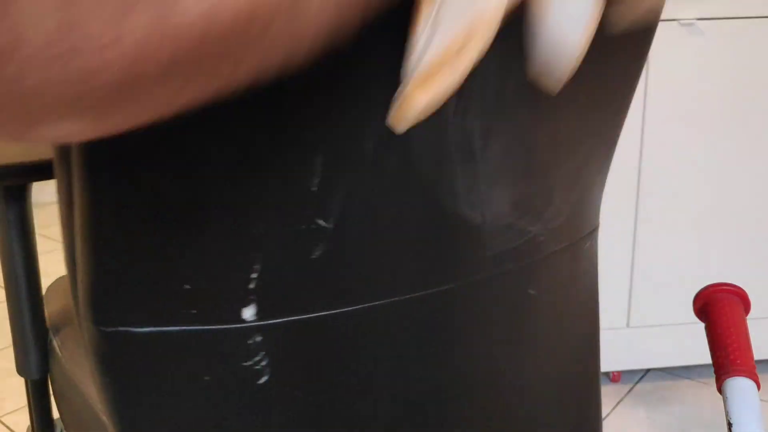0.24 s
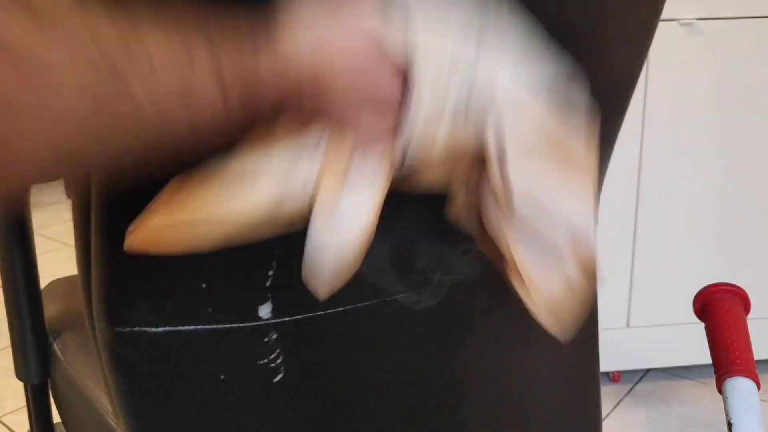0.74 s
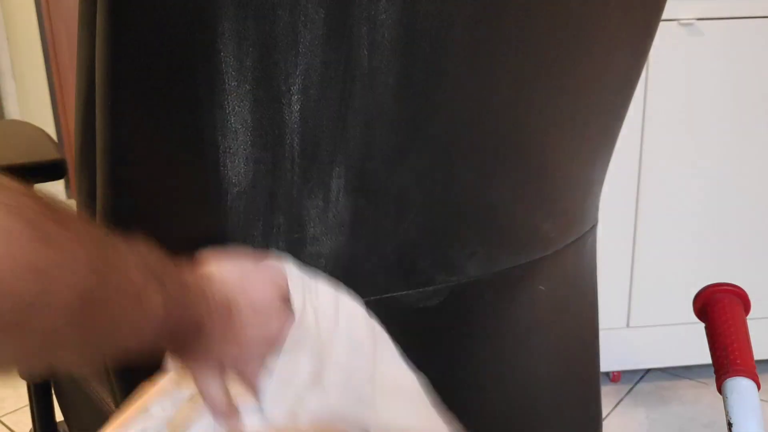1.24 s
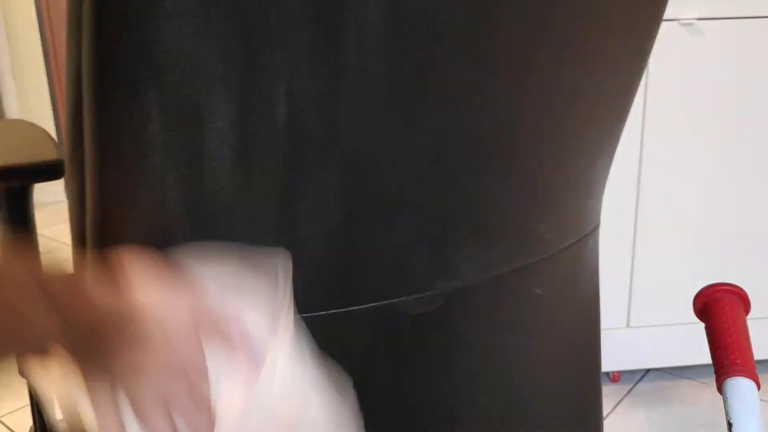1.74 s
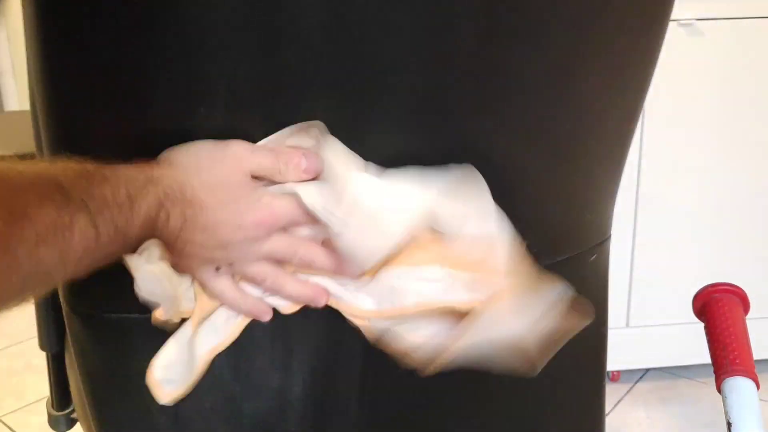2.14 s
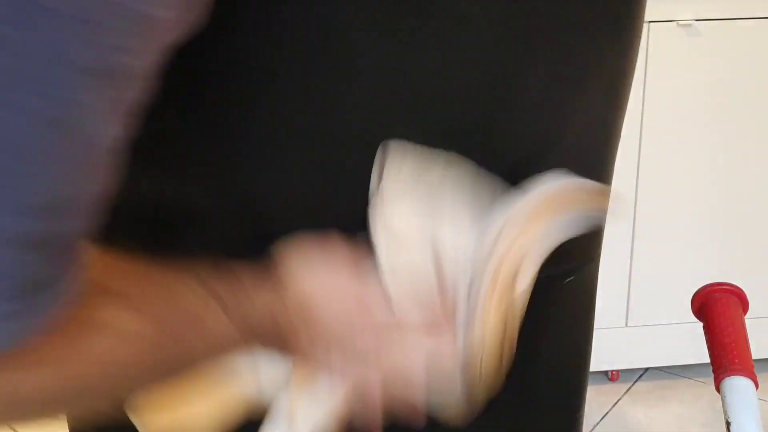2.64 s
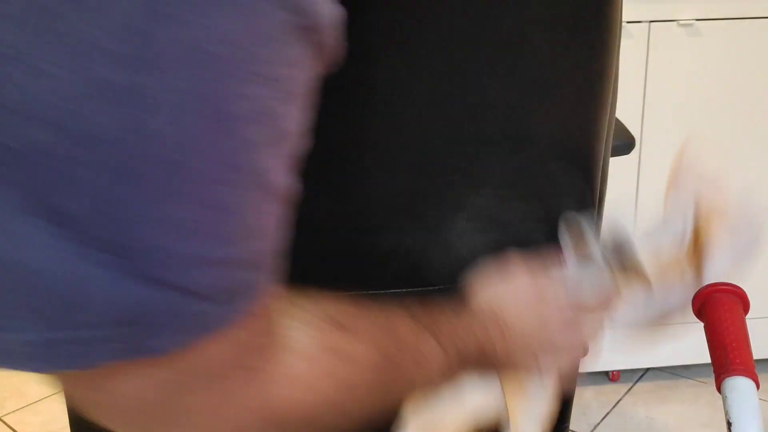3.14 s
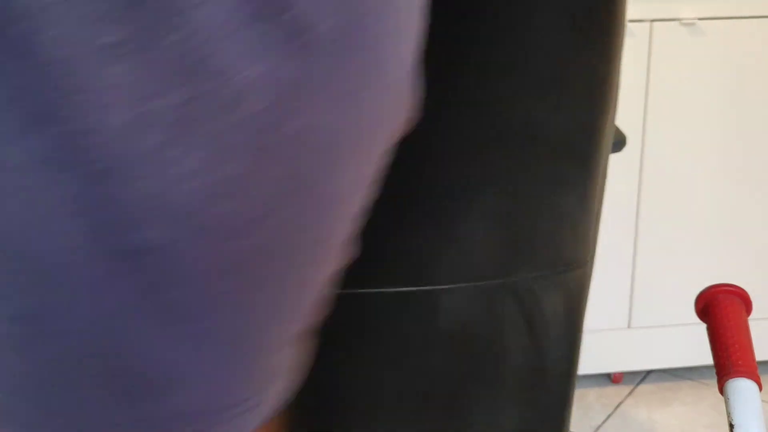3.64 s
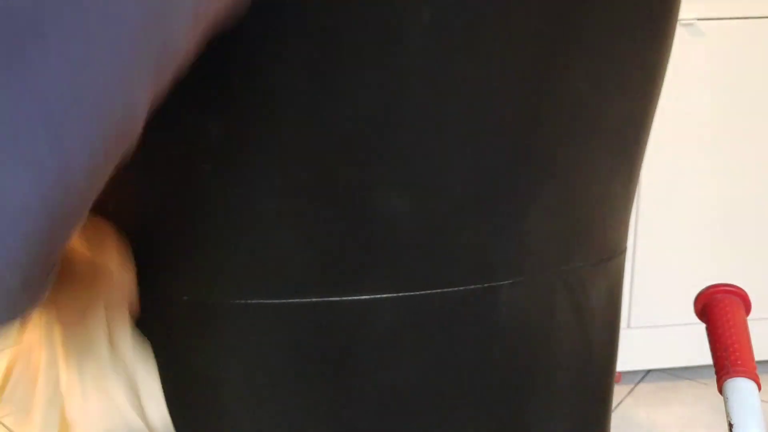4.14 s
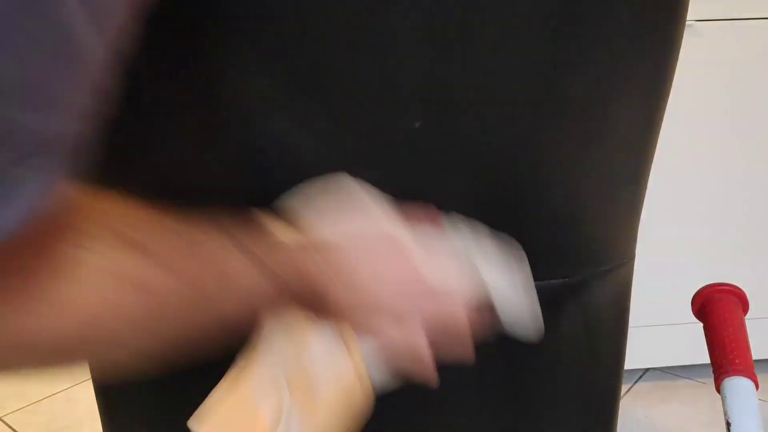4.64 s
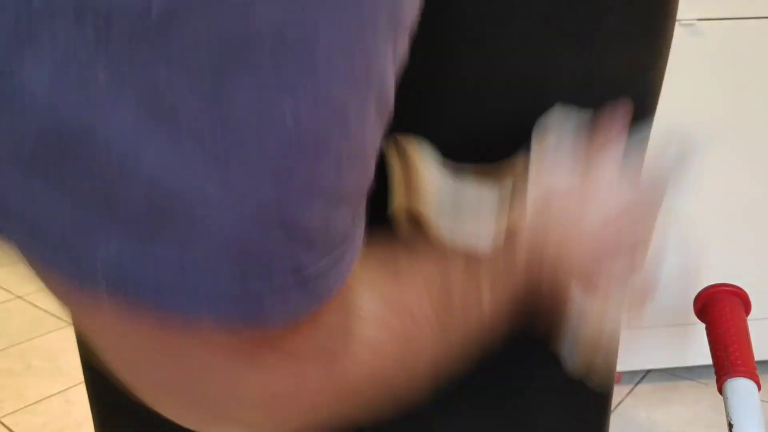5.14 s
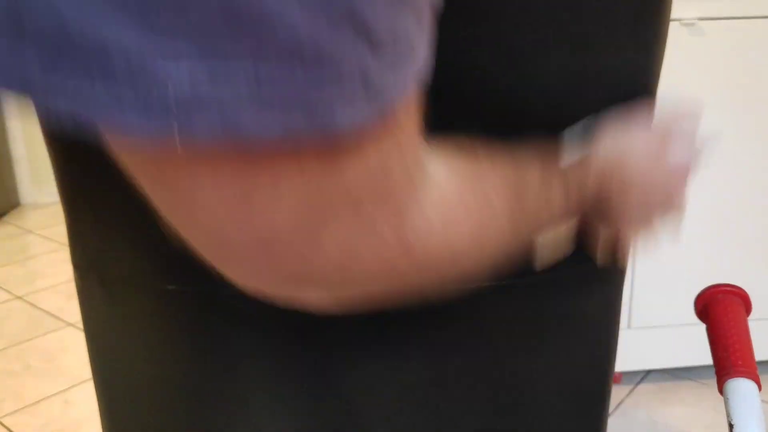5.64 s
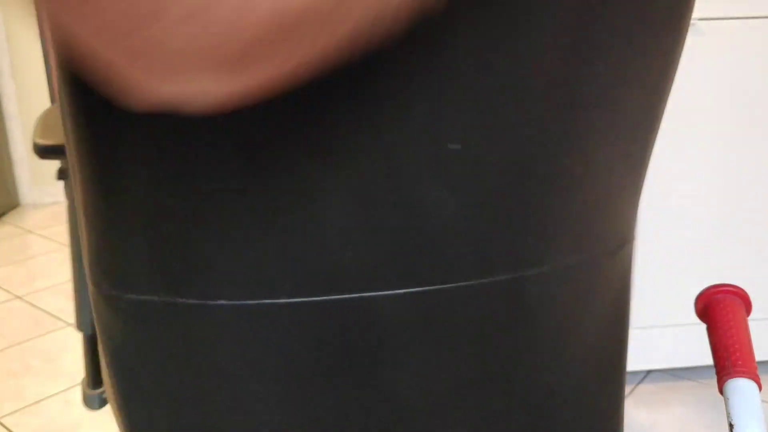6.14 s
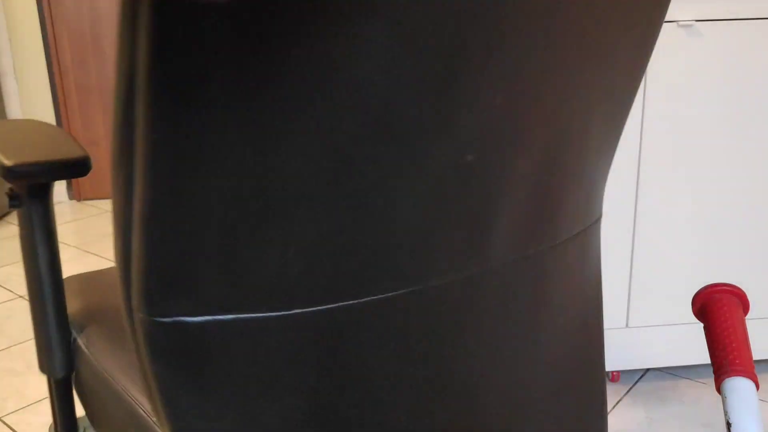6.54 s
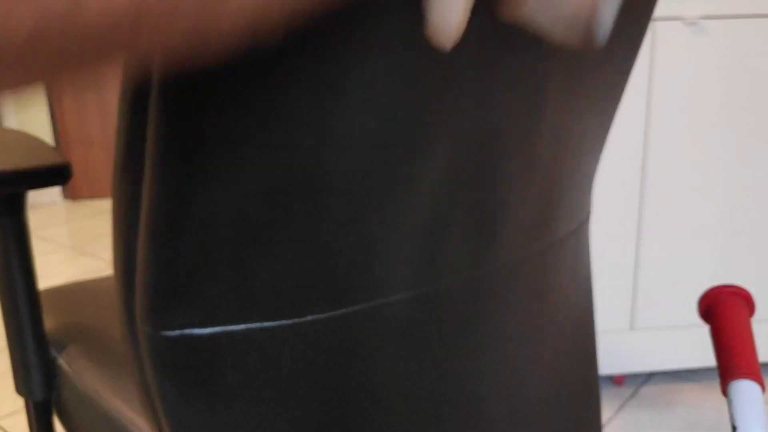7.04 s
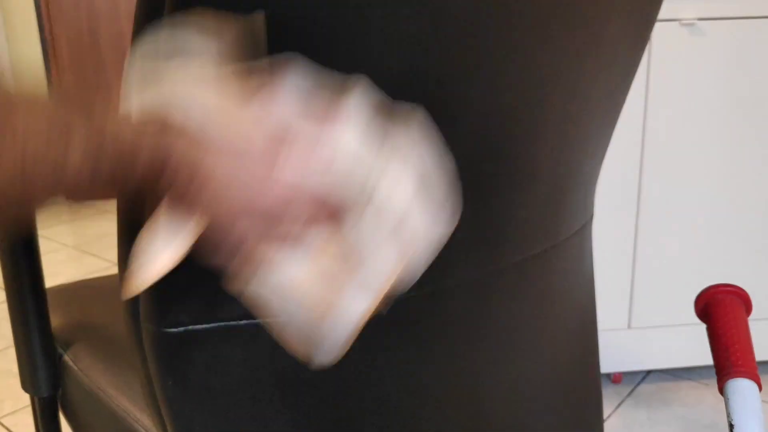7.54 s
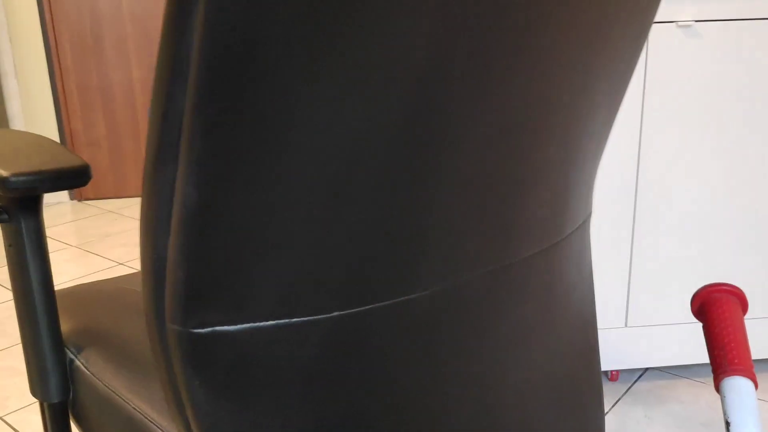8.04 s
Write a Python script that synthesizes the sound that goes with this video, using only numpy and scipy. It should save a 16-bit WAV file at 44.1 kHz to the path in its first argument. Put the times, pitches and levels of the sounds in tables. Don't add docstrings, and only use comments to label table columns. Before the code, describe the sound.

A dry rag wipes a padded leather chair back in fast, uneven hissing strokes, close to a stereo microphone in a quiet tiled room. Knuckles bump the seam early on and the padding thuds softly. The strokes are strongest in the first three seconds, where a cloth edge cracks sharply; they then grow softer and more spaced, before quick swipes resume and fade.

```python
import sys
import numpy as np
from scipy import signal
from scipy.fft import rfft, irfft
from scipy.io import wavfile
from scipy.ndimage import uniform_filter1d

SR = 44100
rng = np.random.default_rng(int(sys.argv[2]) if len(sys.argv) > 2 else 0)


def dump_mix(stems):
    frames = np.atleast_2d(stems).T
    limited = np.clip(frames, -1, 1)
    pcm = np.round(limited * 32767).astype(np.int16)
    wavfile.write(sys.argv[1], SR, pcm)


def voltage_ratio(level):
    return 10 ** (np.asarray(level, float) / 20)


N = 364751
SIZE, HOP = 512, 128
HZ = np.fft.rfftfreq(SIZE, 1 / SR)


def evened(x):
    return x / np.sqrt(np.mean(abs(x) ** 2) + 1e-20)


def read(points, hz):
    f, value = np.transpose(points)
    return np.interp(np.log(hz + 1), np.log(f + 1), value)


def along(rows, t):
    s, *columns = np.transpose(rows)
    return [np.interp(t, s, c) for c in columns]


def add(mix, s, sound):
    part = mix[max(round(s * SR), 0):][:len(sound)]
    part += sound[:len(part)]


def coloured(x, gain):
    return irfft(rfft(x) * gain(np.fft.rfftfreq(x.shape[-1], 1 / SR)), x.shape[-1])


def power_sum_db(*levels_db):
    return 10 * np.log10(sum(voltage_ratio(2 * level) for level in levels_db))


# f/Hz, likeness/0..1
SAME = [(60, 0.6), (200, 1), (400, 0.91), (700, 0.82), (1300, 0.63), (2400, 0.42), (4400, 0.55),
        (8000, .02)]


def likeness(hz):
    return read(SAME, hz)


def pair(shared, left, right, same):
    same = np.clip(same, 0, 1)
    own = np.sqrt(1 - same ** 2)
    return same * shared + own * left, same * shared + own * right


def swells(s, top_db, rise_s, fall_s, t, shape=1.34):
    s, top_db, rise_s, fall_s = (np.reshape(v, (-1, 1)) for v in (s, top_db, rise_s, fall_s))
    away = abs(t - s) / np.maximum(np.where(t < s, rise_s, fall_s), 1 / 100)
    drop_db = 12 * away ** shape
    return 10 * np.log10(voltage_ratio(2 * (top_db - drop_db)).sum(0) + 1e-9)


# f/Hz, level/dB
FLOOR = [(50, 7), (150, -15), (400, -8), (1500, -46), (4000, -26), (7000, 1), (14000, -16)]


def floor():
    hz = np.fft.rfftfreq(N, 1 / SR)
    ports = np.array(pair(*rfft(rng.standard_normal((3, N))), likeness(hz)))
    return voltage_ratio(-73.5) * evened(irfft(ports * voltage_ratio(read(FLOOR, hz)), N))


# t/s, air push level/dB
SWINGS = [(0, -66), (.32, -63), (.53, -59), (.9, -57), (1.269, -59), (1.68, -56), (2.0, -45), (2.21, -57),
          (2.4, -51), (2.79, -42.5), (2.88, -50), (3.48, -53.5), (4.1, -54), (4.25, -65), (4.38, -55.5),
          (4.63, -52), (4.91, -51), (5.13, -55), (5.48, -52), (5.86, -53), (6.2, -55), (6.52, -53),
          (6.62, -56), (6.75, -54), (7.36, -54), (7.46, -60), (7.78, -56), (7.93, -56), (8.27, -55)]


def arm(t):
    s, push_db = np.transpose(SWINGS)
    rise_s, fall_s, still_air_db = 0.075, 0.14, -63.5
    return power_sum_db(swells(s, push_db, rise_s, fall_s, t), still_air_db)


# f/Hz, level/dB
AIR_COLOUR = [(7.1, -31.5), (12, 11), (38, 3.5), (76, -4.5), (139, -7), (173, -12.5), (250, -6.5),
              (320, -22), (550, -120)]


def air():
    lumps = voltage_ratio(3.8 * evened(uniform_filter1d(rng.standard_normal(N), 1500)))
    ports = np.array(pair(*rng.standard_normal((3, N)), 0.97))
    swings = coloured(lumps * ports, lambda hz: voltage_ratio(read(AIR_COLOUR, hz)))
    at = np.arange(0, N, HOP)
    return evened(swings) * np.interp(np.arange(N), at, voltage_ratio(arm(at / SR)))


# t/s of top speed, hiss level/dB, speed-up/s, slow-
# down/s, pressure on the leather/dB over the hiss
STROKES = [(0, -58, 0.015, 0.046, -3), (0.128, -49, 0.6, 0.26, -0.3), (0.415, -43, 0.1, 0.26, -5),
           (0.519, -46.5, 0.033, 0.037, 4.5), (0.684, -43.5, 0.12, 0.17, -2.6),
           (0.803, -50.5, 0.049, 0.06, -0.5), (1.086, -40, 0.17, 0.091, -4.5),
           (1.279, -44, 0.13, 0.14, -4), (1.529, -57.5, 0.079, 0.034, 1.9),
           (1.643, -47, 0.2, 0.25, -2.9), (2.013, -41, 0.1, 0.069, -4),
           (2.196, -40.5, 0.078, 0.11, -4.5), (2.452, -43, 0.12, 0.061, -3.0),
           (2.647, -43.0, 0.14, 0.053, -2), (2.787, -46, 0.011, 0.032, -2),
           (2.84, -40.5, 0.12, 0.065, -4.5), (3.113, -49.5, 0.42, 0.26, -1),
           (3.356, -58.5, 0.042, 0.053, -8), (3.553, -49.5, 0.096, 0.045, -1.5),
               (3.664, -46.5, 0.085, 0.16, -4.5), (4.143, -50, 0.25, 0.15, -1.3),
               (4.407, -57, 0.241, 0.025, 1.3), (4.535, -57.5, 0.053, 0.053, 4.5),
               (4.655, -48, 0.21, 0.082, 3), (4.909, -43, 0.15, 0.075, -2.5),
               (5.101, -48, 0.103, 0.12, -0.1), (5.532, -50.5, 0.16, 0.29, -0.0),
               (5.844, -53, 0.2, 0.094, 2.5),
           (6.066, -49.5, 0.13, 0.12, -0.9), (6.167, -43, 0.048, 0.067, -0.5),
               (6.305, -48, 0.033, 0.15, 0), (6.445, -43.5, 0.21, 0.089, -5.5),
               (6.628, -53.5, 0.089, 0.061, 2.5), (6.751, -44.5, 0.208, 0.049, -3),
               (6.873, -49, 0.051, 0.363, -1.8), (7.029, -45, 0.24, 0.077, -3.5),
               (7.227, -48, 0.075, 0.081, -1), (7.348, -41.5, 0.12, 0.038, -6.5),
               (7.46, -57, 0.052, 0.29, 3), (7.631, -46.5, 0.36, 0.097, -3),
               (7.984, -54.5, 0.32, 0.064, 2.3), (8.198, -50.1, 0.13, 0.222, 0.6),
           (5.24, -60, .05, 0.1, 0.9),
    (0.226, -58, .05, .04, 4.3),
]
# t/s, fibre fizz level/dB over the hiss
FACING = [(0, -4), (.42, -6), (.65, -3.5), (1.1, -6.5), (1.65, -6.5), (2.1, -3), (2.65, -8), (2.85, -3.5),
          (3.15, -1), (3.66, -8), (4.15, -4.5), (4.65, -7.5), (4.9, -2), (5.15, -8), (6.2, -10.5),
          (7.05, -7.5), (7.23, -5.5), (7.4, -11.5)]
# t/s, level/dB
LEAN = [(0, 7), (.12, -4.5), (.45, -6.5), (1.05, -2.5), (1.7, 2.5), (2.2, 2.5), (2.55, 10), (3.4, -1.5),
        (3.95, 7), (4.8, -2.5), (5.4, 6), (5.75, -12), (6.2, 1.5), (6.42, -10), (7.0, -14), (7.46, 4),
        (7.56, -11), (8.27, -12)]


def contact(t):
    s, top_db, rise_s, fall_s, press_db = np.transpose(STROKES)
    rustle_db, sag_db = -65.5, -67
    hiss_db = power_sum_db(swells(s, top_db, rise_s, fall_s, t), rustle_db)
    fizz_db = hiss_db + along(FACING, t)[0]
    scrape_db = swells(s, top_db + press_db, rise_s, fall_s, t, shape=2.04)
    drum_db = swells(s, top_db - 9 + 1.65 * press_db, rise_s, fall_s, t) + along(LEAN, t)[0]
    bump_s, bump_db, _ = np.transpose(KNUCKLES + PALM)
    boom_rise_s, boom_fall_s = 0.016, 0.051
    boom_db = swells(bump_s, bump_db - 13, boom_rise_s, boom_fall_s, t)
    weight_db = power_sum_db(drum_db, boom_db, sag_db)
    drum_limit_db = -52
    return hiss_db, fizz_db, scrape_db, np.minimum(weight_db, drum_limit_db)


def slips(per_s, spread_db):
    caught = rng.random(N) < per_s / SR
    size = voltage_ratio(spread_db * np.minimum(rng.exponential(1, N), 5)) * caught
    return evened(size * rng.standard_normal((3, N)))


# f/Hz, level/dB
WEAVE = [(1500, -16.5), (2400, -3), (3200, -2.5), (5000, -4), (7000, -3), (8200, -6.5), (10000, -15),
         (12500, -51)]
# f/Hz, level/dB
FIBRES = [(6000, -20), (8000, 7), (9500, 7), (12000, 6.5), (14300, -0.5), (16000, -35)]
# f/Hz, level/dB
LEATHER = [(450, -69), (750, -5.5), (1100, 1), (1700, 1.5), (2400, -2), (3400, -17), (5500, -16)]
# f/Hz, level/dB
PADDING = [(90, -31), (170, -9.5), (260, -5), (420, 1.5), (650, 3), (900, 0.5), (1500, -32)]
# t/s, delay of the left port/ms
HAND = [(0, -0.047), (.4, -0.035), (.7, -0.063), (.95, 0.12), (1.65, 0.14), (2.15, .11), (2.6, 0.0029),
        (3.35, -0.082), (4.15, 0.22), (4.9, -0.086), (5.6, -0.11), (6.4, -0.011), (7.0, 0.021),
        (7.4, 0.064), (8.27, 0.036)]


def rubbing():
    _, t, z = signal.stft(slips(per_s=30000, spread_db=0.44), SR, nperseg=SIZE, noverlap=SIZE - HOP)
    power = 0
    for shape, db in zip((WEAVE, FIBRES, LEATHER, PADDING), contact(t)):
        power = power + evened(voltage_ratio(read(shape, HZ)))[:, None] ** 2 * voltage_ratio(2 * db)
    patches = uniform_filter1d(rng.standard_normal(power.shape), 8, 0)
    patches = evened(uniform_filter1d(patches, 22, 1))
    flutter = evened(uniform_filter1d(rng.standard_normal(len(t)), 9))
    folds = voltage_ratio(1.5 * patches + 0.69 * flutter + 2.0)
    left, right = pair(*z, likeness(HZ)[:, None])
    lag_ms = along(HAND, t)[0]
    left = left * np.exp(-2j * np.pi * HZ[:, None] * lag_ms / 1000)
    balance = voltage_ratio((0.3 - 6.5 * lag_ms) / 2)
    field = np.array([left * balance, right / balance]) * np.sqrt(power) * folds
    return signal.istft(field, SR, nperseg=SIZE, noverlap=SIZE - HOP)[1][:, :N]


# t/s, peak level/dB, f/Hz
KNUCKLES = [(.331, -44, 833), (.511, -23, 503), (.526, -36, 483), (.558, -43, 495), (.586, -39, 864),
            (.917, -44, 880), (1.186, -30, 655), (1.191, -36.5, 560), (1.254, -38.5, 820),
            (1.983, -31.5, 530), (1.996, -32.5, 880), (2.168, -37, 666), (2.524, -49, 660),
            (2.648, -33, 865), (2.785, -36.5, 500), (2.814, -33.5, 490), (3.345, -41, 550),
            (3.383, -46.5, 552.4), (3.457, -47.5, 794), (3.738, -43, 606), (4.629, -37, 810),
            (5.143, -31, 590), (5.8355, -42.5, 800), (6.289, -37.5, 675), (6.711, -41, 659),
            (6.759, -38, 584), (6.842, -41.5, 735)]
# t/s, peak level/dB, f/Hz
PALM = [(.517, -41, 140), (.52, -25, 360), (.531, -35, 257), (1.071, -46, 243), (1.623, -43, 297),
        (1.637, -43.5, 387), (1.917, -45.5, 245), (2.829, -37, 390), (3.027, -43.5, 448), (3.6, -51, 367),
        (4.102, -44, 252), (4.124, -51, 342), (4.896, -42, 262), (4.909, -48, 300), (5.113, -37, 305),
        (5.118, -45, 387), (5.537, -38, 405), (5.564, -45, 365), (5.835, -51, 233), (7.311, -46, 363),
        (7.348, -42.5, 380), (7.361, -42, 308), (7.799, -49, 246)]


def bump_rows():
    hardest_db = max(db for _, db, _ in PALM)
    palm = [(s, db, hz, 0.99 + 0.09 * (hardest_db - db)) for s, db, hz in PALM]
    knuckles = [(*row, 1.93) for row in KNUCKLES]
    return knuckles + palm


def knocks(rows):
    out = np.zeros(N)
    signs = rng.choice([-1., 1.], (len(rows), 1))
    for (s, db, hz, cycles), sign in zip(rows, signs):
        u = np.arange(-1.5 * cycles / hz, 1.5 * cycles / hz, 1 / SR) * hz
        bell = np.exp(-(np.where(u < 0, 3., 1.8) * u / cycles) ** 2)
        snap = 0.73 * np.cos(2 * np.pi * 2.16 * u) * bell
        wave = np.cos(2 * np.pi * u) + snap
        wave = (wave - wave @ bell / bell.sum()) * bell
        add(out, s - 1.445 * cycles / hz + 0.00146, sign * voltage_ratio(db) * wave)
    return out


# f/Hz, level/dB, t60/s
FRAME = [(149, -2, 0.12), (262, -6, 0.28), (416, 5, 0.046), (513.5, 1, 0.11), (700, 1, 0.077),
         (950, 3, 0.12), (1280, -37, 0.025)]


def frame(blows):
    t = np.arange(SR // 4) / SR
    ring = sum(voltage_ratio(db - 60 * t / t60) * np.sin(2 * np.pi * hz * t) for hz, db, t60 in FRAME)
    return signal.oaconvolve(blows, ring / np.linalg.norm(ring))[:N]


# f/Hz, t60/s
ROOM = [(200, 0.56), (1000, 0.55), (4000, 0.076), (12000, 0.13)]


def room(x):
    taps = np.zeros((2, SR // 2))
    at = np.arange(300, SR // 2 - 20, 20)
    at_random = at + rng.integers(0, 20, (2, len(at)))
    np.put_along_axis(taps, at_random, rng.choice([-1., 1.], (2, len(at))), 1)
    hz, t, z = signal.stft(taps, SR, nperseg=256)
    z = np.array(pair(z[0], z[0], z[1], likeness(hz)[:, None]))
    decay = voltage_ratio(-60 * t / read(ROOM, hz)[:, None])
    tail = signal.istft(z * decay, SR, nperseg=256)[1]
    return signal.fftconvolve(x[None], tail / np.linalg.norm(tail[0]), axes=1)[:, :N]


# t/s, peak level/dB, f/Hz, length/cycles
FLICKS = [
    (0.5207, -34, 1630, 2.8),
    (0.9207, -45, 2240, 4.3),
    (1.186, -36, 1700, 3),
    (1.9854, -41, 2060, 5.0),
    (2.444, -32, 2980, 8.1),
    (2.6467, -32, 2680, 6.2),
    (2.7422, -37, 2680, 4.6),
    (2.838, -33, 3080, 6),
    (5.835, -46, 2450, 5.0),
    (1.1862, -34, 2900, 5),
]


def edge_flicks():
    return knocks(FLICKS)


# t/s, peak level/dB, f/Hz, length/cycles
WHIP = [
    (2.79, -23, 7040, 8.),
    (2.7898, -29, 9800, 5.),
    (2.7898, -32, 12000, 4.),
]


def hem_whip():
    return knocks(WHIP)


def scene():
    quiet, push, rub = floor(), air(), rubbing()
    bumps = knocks(bump_rows())
    hits = bumps + voltage_ratio(-19) * frame(bumps) + edge_flicks() + hem_whip()
    echo = room(voltage_ratio(-14.5) * hits + voltage_ratio(-17) * rub.mean(0))
    return rub + hits + echo + push + quiet


def low_pass(x):
    return signal.sosfilt(signal.butter(12, 15520, fs=SR, output="sos"), x)


# f/Hz, left minus right level/dB
PORTS = [(60, -1), (500, -2), (800, .6), (1800, -1), (4000, -1.5), (5500, -3.5), (7000, -8.5), (8500, 0),
         (10000, 7.5), (12000, 11.5), (14300, 18.5)]


def record(dry):
    tilt = np.array([[.5], [-.5]])
    edge_hz = 14310
    ported = coloured(dry, lambda hz: voltage_ratio(tilt * read(PORTS, hz)) * (hz < edge_hz))
    return low_pass(ported)


dry = scene()
out = record(dry)
dump_mix(out)
```